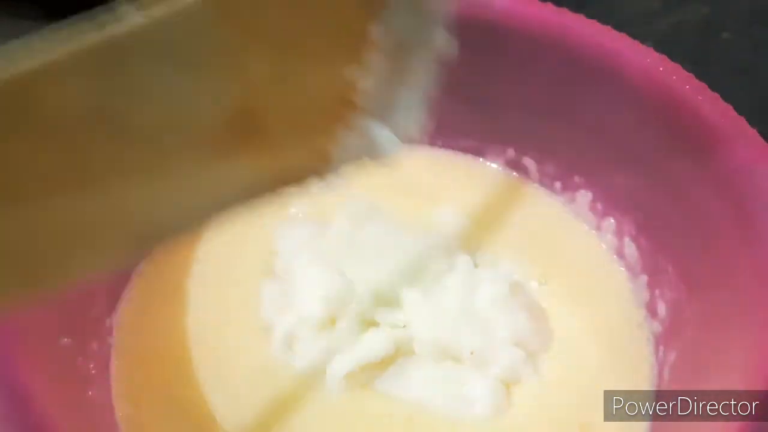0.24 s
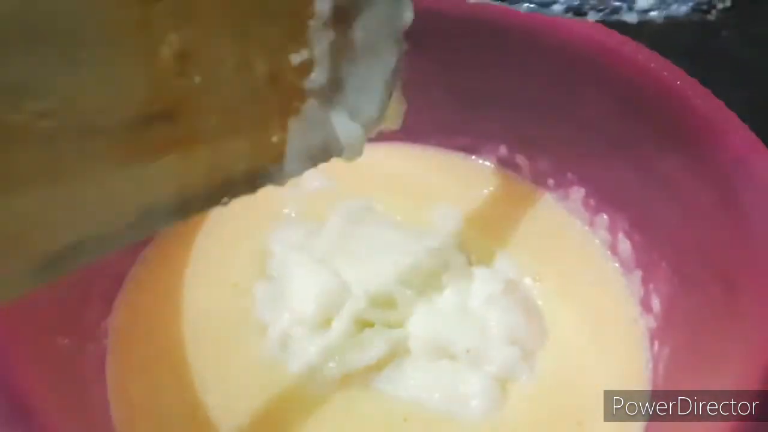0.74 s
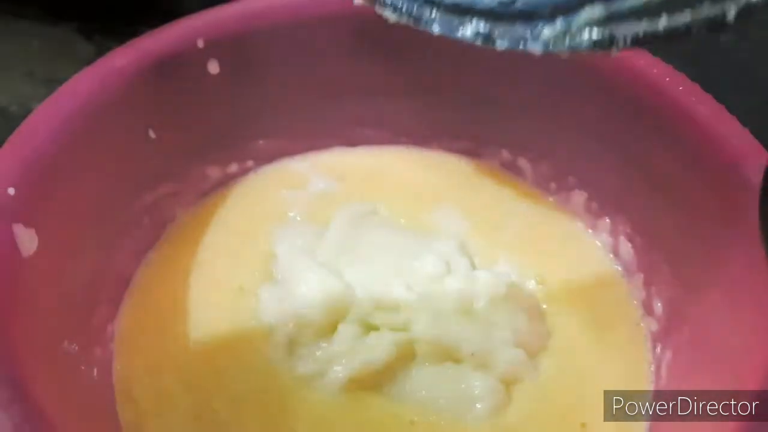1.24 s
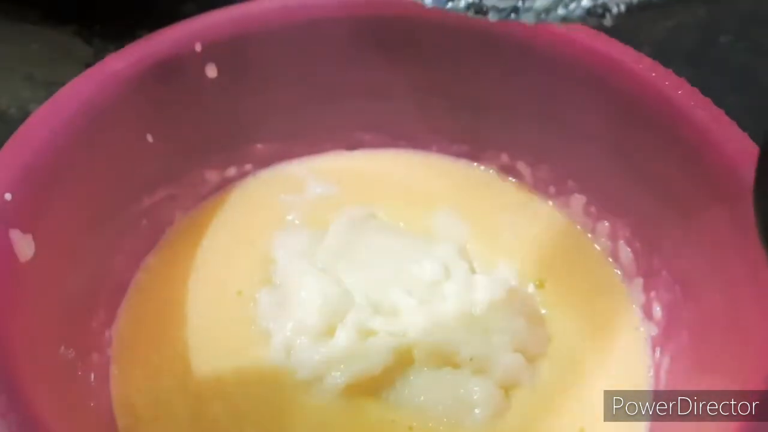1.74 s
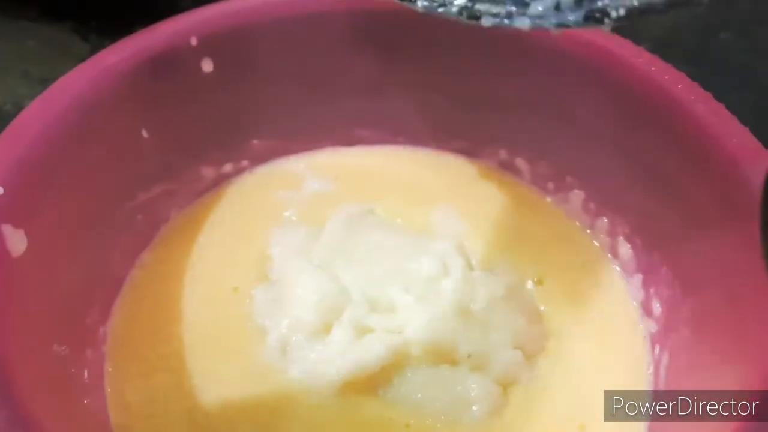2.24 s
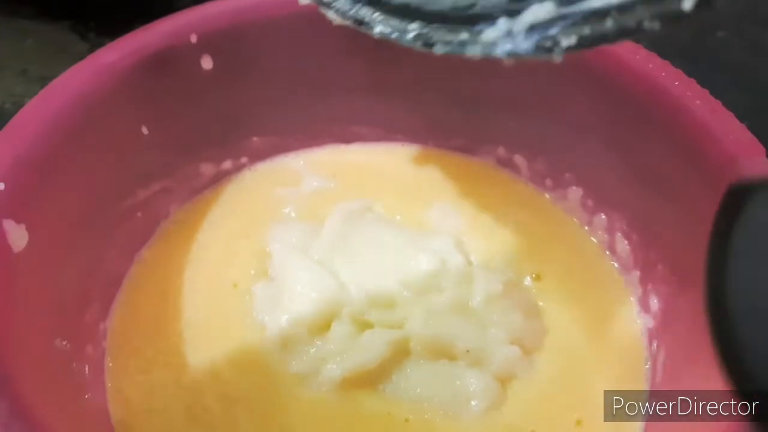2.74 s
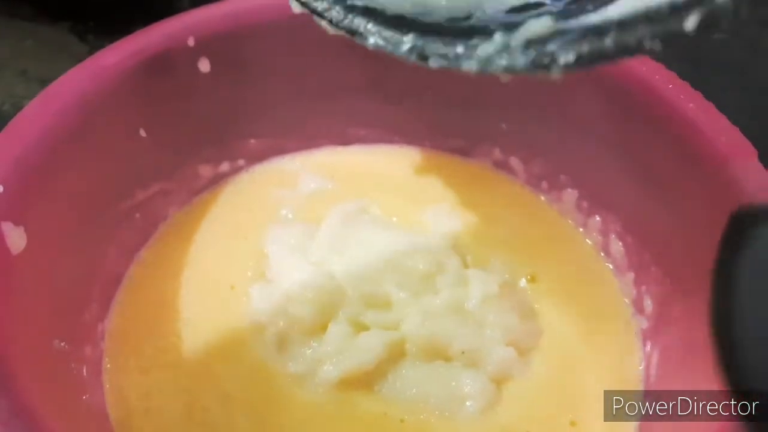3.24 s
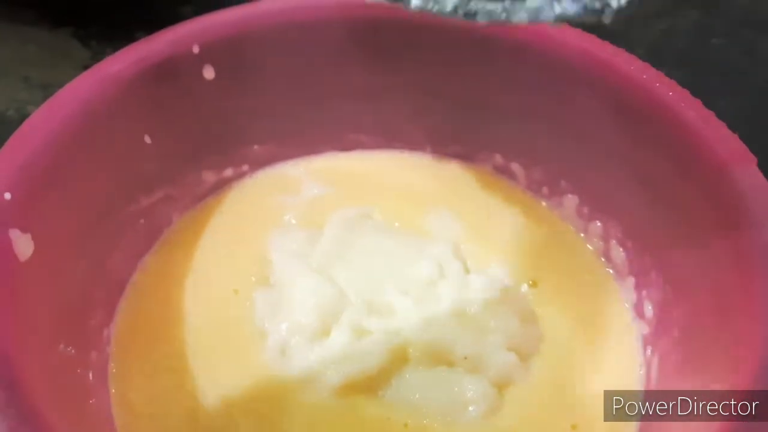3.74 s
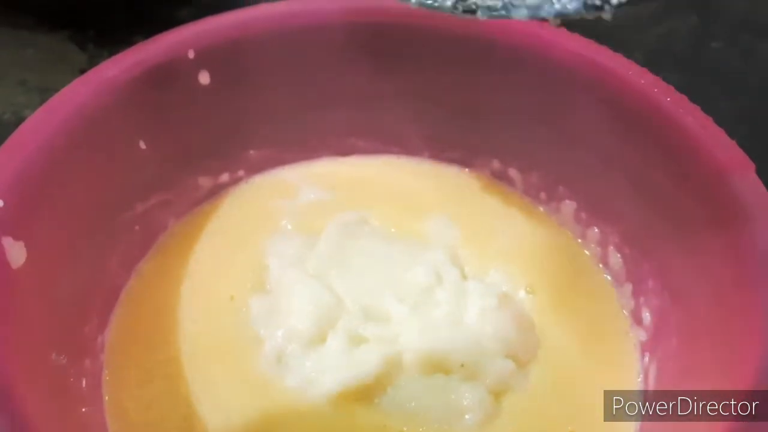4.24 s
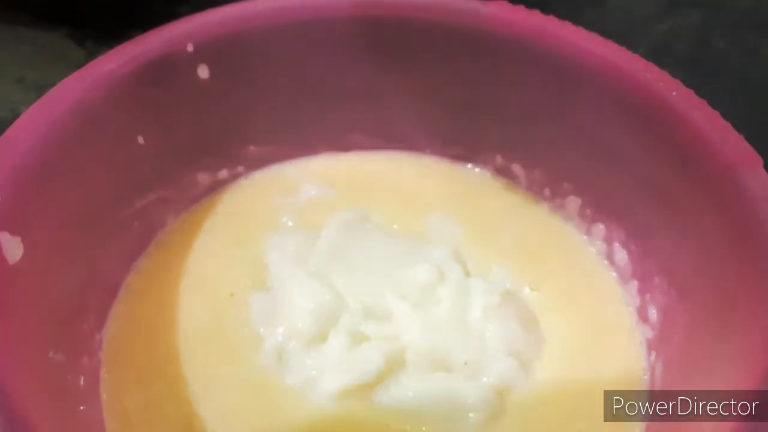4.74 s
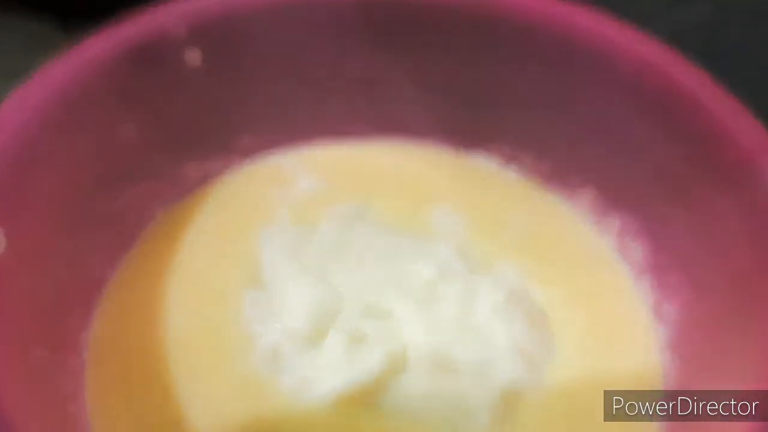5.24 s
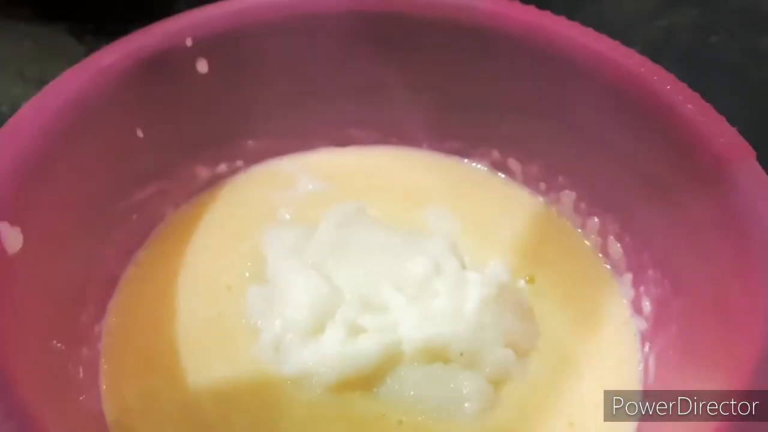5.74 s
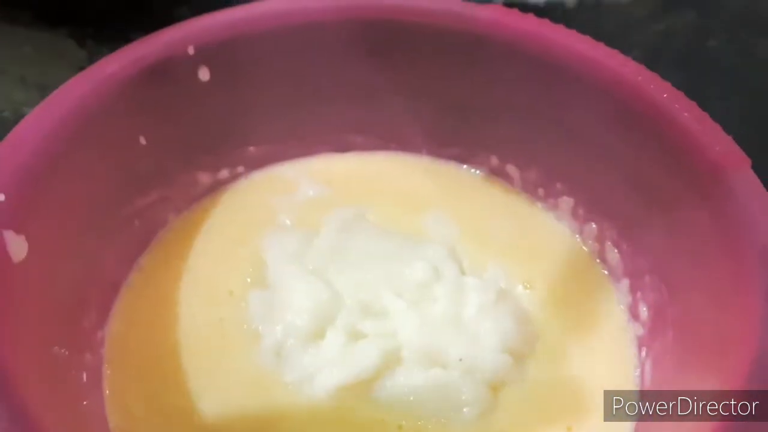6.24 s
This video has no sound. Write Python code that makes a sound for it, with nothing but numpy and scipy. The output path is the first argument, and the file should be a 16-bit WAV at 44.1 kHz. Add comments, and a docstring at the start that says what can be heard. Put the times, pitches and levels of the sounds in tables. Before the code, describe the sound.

One heavy worktop knock, then close, repeated scraping of a wooden spatula clearing wet mixture from a ringing glass bowl.

```python
"""A faint scrape, then one heavy knock on a kitchen worktop. After it a wooden spatula clears the last
of a mixture from a thick glass bowl, close to a stereo pair of microphones. The blade lands with soft
knocks and drags along the wall; both set glass and wood ringing, while the contact rasps and hisses
and the wet film pops. Mains hum and room noise lie underneath, a faint high rustle comes at either
end, and the kitchen adds a short tail."""
import sys
import numpy as np
from scipy import signal
from scipy.fft import rfft, irfft
from scipy.io import wavfile

SR = 44100
rng = np.random.default_rng(int(sys.argv[2]) if len(sys.argv) > 2 else 0)


def store_pcm(level_fs):
    """Save levels as 16-bit WAV."""
    pcm = np.round(np.clip(level_fs, -1, 1) * 32767).astype(np.int16)
    wavfile.write(sys.argv[1], SR, np.atleast_2d(pcm).T)


N = 286209


def from_db(db):
    """Amplitude of a level in dB."""
    return 10 ** (np.asarray(db) / 20)


def unit_rms(x):
    """The signal scaled to an rms of 1."""
    return x / np.sqrt(np.mean(x ** 2) + 1e-20)


def curves(rows):
    """One curve per column, joining rows that begin with a time in seconds."""
    times, *columns = np.transpose(rows)
    return [np.interp(np.arange(N) / SR, times, column) for column in columns]


def sides(pan_db):
    """Gains at the two microphones; pan is always left minus right in dB."""
    return from_db(np.array([pan_db / 2, -pan_db / 2]))


def drift(rate_hz):
    """Random wander with an rms of 1: noise through a double one-pole low-pass."""
    r = np.exp(-2 * np.pi * rate_hz / SR)
    return unit_rms(signal.lfilter([1], [1, -2 * r, r * r], rng.standard_normal(N + SR))[SR:])


def filtered(x, order, hz, kind):
    """The signal through a Butterworth filter."""
    return signal.sosfilt(signal.butter(order, hz, kind, fs=SR, output="sos"), x)


def low_cut(x, hz):
    """Bass roll-off, as from a small body that sends out little below its lowest mode."""
    return filtered(x, 3, hz, "high")


def coloured_noise(spectrum, pan, likeness):
    """Stereo noise with level, pan and left-right likeness set by frequency; its mid has an rms of 1."""
    log_hz = np.log(np.maximum(np.fft.rfftfreq(N, 1 / SR), 1))
    gain_db, pan_db, alike = (np.interp(log_hz, np.log(hz), values)
                              for hz, values in map(np.transpose, (spectrum, pan, likeness)))
    alike = np.clip(alike, 0, 1)
    mid, side = rfft(rng.standard_normal((2, N)))
    pair = np.sqrt(1 + alike) * mid + np.sqrt(1 - alike) * side * [[1], [-1]]
    noise = irfft(pair * from_db(gain_db) * sides(pan_db), N)
    return noise / np.sqrt(np.mean(noise.mean(axis=0) ** 2))


def ring(modes, forces):
    """Each mode rings with its own force and reaches the microphones with its own pan and phase."""
    out = np.zeros((2, N))
    for (hz, level_db, t60, pan_db, offset_ms), force in zip(modes, forces):
        r, w = from_db(-60 / (t60 * SR)), 2 * np.pi * hz / SR
        poles = [1, -2 * r * np.cos(w), r * r]
        for mic, phase in enumerate([0, 2 * np.pi * hz * offset_ms / 1000]):
            mode = signal.lfilter([-np.sin(phase), r * np.sin(w + phase)], poles, force[mic] + 1e-18)
            out[mic] += from_db(level_db) * sides(pan_db)[mic] * mode
    return out


def blows(times, db, pan_db, sharpness_hz):
    """Force of soft contacts: smooth bumps, wider when the contact is softer."""
    out, t = np.zeros((2, N)), np.arange(200) / SR
    bump = np.exp(-.5 * (2 * np.pi * sharpness_hz * (t - .001)) ** 2)
    for start, level_db, side_db in zip(times, db, pan_db):
        at = round(start * SR)
        force = np.outer(sides(side_db), -from_db(level_db) * bump / bump.sum())
        out[:, at:at + len(t)] += force[:, :N - at]
    return out


def bursts(times, db, pan_db, decay_s, above_hz):
    """Bright noise bursts that die fast."""
    out, t = np.zeros((2, N)), np.arange(2000) / SR
    for start, level_db, side_db in zip(times, db, pan_db):
        at = round(start * SR)
        burst = from_db(level_db) * rng.standard_normal((2, len(t))) * np.exp(-t / decay_s)
        out[:, at:at + len(t)] += sides(side_db)[:, None] * burst[:, :N - at]
    return low_cut(out, above_hz)


def room_tone():
    """The kitchen's own noise, mostly bass, its level wandering slightly."""
    # Colour of the room noise. Each row: frequency in Hz, relative density in dB.
    spectrum = [(15, -47.5), (25, -27.5), (110, -3), (221, -9.5), (305, -8), (782, -24), (997, -19.5),
                (1490, -31), (2420, -32), (2850, -59), (3170, -38), (4750, -35.5), (5140, -44.5),
                (6550, -33.5), (15500, -49.5)]
    # Its balance across the pair. Each row: frequency in Hz, pan in dB.
    pan = [(60, -8), (110, 0), (200, 3), (380, 1.5), (700, -0.5), (1290, 1), (2380, 5), (4400, 0),
           (8120, 1), (15000, 12.5)]
    # How alike the microphones hear it. Each row: frequency in Hz, likeness (below 0 counts as 0).
    likeness = [(60, 0.59), (130, 0.88), (290, 0.85), (640, 0.22), (1410, -0.28), (3100, -0.71),
                (6820, -0.62), (15000, -0.37)]
    return from_db(-55.5 + drift(2.1)) * coloured_noise(spectrum, pan, likeness)


def mains_hum(hz=100.7, third_db=-12.5):
    """A wavering mains hum with a weak third harmonic, a little to the right."""
    # Course of the hum. Each row: time in seconds, level in dB.
    levels = [(0.0, -80), (0.12, -57), (0.67, -53), (1.0, -50.5), (1.32, -62.5), (1.5, -51.5),
              (2.46, -49.5), (2.56, -57.5), (2.95, -49), (3.18, -58.5), (3.4, -46.5), (3.54, -60.5),
              (3.72, -46.5), (4.07, -53), (4.26, -47.5), (4.48, -58), (4.6, -47), (4.83, -56), (5.01, -51),
              (6.49, -51.5)]
    phase = 2 * np.pi * hz * np.arange(N) / SR + 0.31 * drift(6.1)
    tone = np.sqrt(2) * (np.sin(phase) + from_db(third_db) * np.sin(3 * phase))
    return from_db(curves(levels)[0]) * tone * sides(-3.5)[:, None]


def rustle(fade_db_per_s=400):
    """Thin, uneven noise at the top of the range, mostly in the left microphone."""
    # Spells of rustling. Each row: start in seconds, end in seconds, level in dB.
    spells = [(0.04, 0.5, -70), (6.276, 6.42, -68)]
    t = np.arange(N) / SR
    noise = low_cut(rng.standard_normal((2, N)), 8500) * sides(13.0)[:, None]
    gain = sum(from_db(db - fade_db_per_s * abs(t - np.clip(t, start, end))) for start, end, db in spells)
    return gain * from_db(1.8 * drift(30)) * noise


def kitchen_reverb(x, t60_s=0.47, wall_cut_hz=9000):
    """Diffuse tail off the walls: alike at both microphones in the bass, dying faster in the treble."""
    t = np.arange(SR) / SR
    white = rng.standard_normal((2, SR))
    low = filtered(white, 1, wall_cut_hz, "low")
    tail = low * from_db(-60 * t / t60_s) + (white - low) * from_db(-60 * t / (.7 * t60_s))
    tail *= np.clip((t - .003) / 0.0027, 0, 1)   # first walls a metre or two away
    tail /= np.sqrt(np.sum(tail ** 2, axis=1, keepdims=True))
    mid = tail.mean(axis=0)
    return signal.fftconvolve(x, mid + low_cut(tail - mid, 340), axes=1)[:, :N]


def worktop_knock(at_s=.717):
    """One blow: the board thuds briefly, its lowest modes hang on and loose things on it rattle."""
    # Worktop modes. Each row: frequency in Hz, gain in dB, seconds to fall 60 dB, pan in dB,
    # time offset at the right microphone in ms.
    modes = [(101, -26, .8, -7.5, 0.02), (126.3, -30, 0.74, -8, 0.02), (372.5, -23.5, 0.32, -7, .02),
             (462, -27.5, 0.17, -15, 0.072), (850, -4.5, 0.019, 2, 0.16), (1188, 5, 0.004, 3, 0.21),
             (1590, -11, 0.022, 7.5, 0.12), (2580, 2.5, 0.0025, -9.5, 0.16)]
    force = blows([at_s], db=[-3.5], pan_db=[0], sharpness_hz=1601)
    thud = ring(modes, [force] * len(modes))
    rattle = bursts([at_s + 0.0023], db=[-21], pan_db=[3.0], decay_s=0.007, above_hz=2200)
    return low_cut(thud, 73.2) + filtered(rattle, 2, 5000, "low")


def film_snaps():
    """Tiny pops as the wet film snaps off the glass."""
    # The pops. Each row: start in seconds, level in dB, pan in dB.
    snaps = [(0.138, -55, -2), (1.2092, -49, 11), (2.5406, -46, 29), (3.1452, -51, 20), (3.1543, -40.5, 20),
             (3.758, -65, 21), (4.688, -30.5, 10.5), (5.459, -54, 16), (5.779, -38, 7)]
    return bursts(*np.transpose(snaps), decay_s=0.00087, above_hz=8000)


def friction_hiss(db, flicker_db=2.5, flicker_hz=14):
    """The wet film tears in small bursts; each band of the hiss flickers on its own."""
    # Colour of the friction. Each row: frequency in Hz, relative density in dB.
    spectrum = [(1500, -20.5), (2400, -1.5), (3500, -2), (5300, -8), (6300, 2), (7500, -8), (9500, -7),
                (10600, -11.5), (12000, -1.5), (14000, -20), (15700, -19)]
    # Its balance across the pair. Each row: frequency in Hz, pan in dB.
    pan = [(60, -21.5), (110, -1.5), (200, 0.5), (380, 13), (700, -43.5), (1290, 6), (2380, 8.5),
           (4400, -11.5), (8120, 13), (15000, 19.5)]
    crackle = from_db(2.2 * drift(570) + 1.6 * drift(50))
    noise = coloured_noise(spectrum, pan, likeness=[(500, 0.74), (3000, 0.16), (15000, .2)])
    edges_hz = np.geomspace(1200, 18000, 7)
    hiss = sum(from_db(flicker_db * drift(flicker_hz)) * filtered(noise, 2, band, "band")
               for band in zip(edges_hz, edges_hz[1:]))
    return from_db(db) * crackle * hiss


def gap_rasp(db, hz, width_hz=306):
    """The air gap between blade and wall resonates; its pitch slides as the blade moves."""
    r = np.exp(-2 * np.pi * width_hz / SR)
    slow = signal.lfilter([1], [1, -2 * r, r * r], rng.standard_normal((2, N)))
    phase = 2 * np.pi * np.cumsum(hz) / SR
    return from_db(db) * unit_rms(slow[0] * np.cos(phase) + slow[1] * np.sin(phase))


def stroke_curves(settle_s=.034, travel_s=0.11, hiss_over_treble_db=5.5):
    """Levels, pitch and pan of the drag; the blade is off the glass between strokes."""
    # Course of the drag, one list a stroke. Each row: time in seconds, then the treble of the
    # friction, the ringing of the bowl and the rasp, all in dB.
    drags = [
        [(0.1, -94, -85, -95), (0.128, -72, -85, -92), (0.14, -72, -62, -74), (0.326, -76, -79, -72),
         (0.388, -74, -84, -92), (0.402, -74.5, -54, -91), (0.428, -69, -48, -92), (0.62, -89, -71, -94)],
        [(1.2, -79, -52.5, -67), (1.224, -68, -45, -69), (1.248, -70.5, -52, -83), (1.296, -54, -45, -45),
         (1.338, -50.5, -29, -38), (1.372, -44, -29.5, -37), (1.456, -63, -40, -68), (1.56, -94, -59, -89)],
        [(1.725, -57.5, -39.5, -58), (1.755, -54.5, -42, -60), (1.765, -54.5, -38, -53),
         (1.781, -52.5, -38, -39.5), (1.817, -54, -34, -37.5), (1.835, -51, -31, -49), (1.889, -62, -38.5, -71),
         (2.0, -82, -56, -68)],
        [(2.137, -54.5, -34, -48), (2.169, -54, -35.5, -52), (2.203, -51.5, -36.5, -34.5),
         (2.243, -53, -34, -40), (2.267, -50, -34.5, -51), (2.301, -62.5, -40.5, -48), (2.375, -73, -56, -68),
         (2.4, -82.5, -56, -67.5)],
        [(2.53, -65, -36, -54), (2.54, -55.5, -34, -55), (2.572, -56.5, -38, -53), (2.614, -50, -28, -34.5),
         (2.672, -50, -27.5, -43), (2.678, -52, -26.5, -55), (2.762, -72, -50, -72), (2.8, -81, -53, -75)],
        [(2.936, -51, -38, -41), (2.98, -45.5, -28, -42), (3.02, -49, -37, -42.5), (3.052, -51.5, -43.5, -52),
         (3.13, -75, -54, -76), (3.154, -66, -63, -77), (3.164, -75, -68, -75), (3.2, -71, -57, -72)],
        [(3.324, -53.5, -41, -47), (3.37, -53.5, -37, -45.5), (3.41, -56, -46.5, -50), (3.444, -73, -64.5, -71),
         (3.492, -70.5, -64, -74), (3.532, -81, -72, -81), (3.544, -69, -68, -87), (3.56, -88, -82, -92)],
        [(3.702, -59, -43, -46), (3.714, -56, -38, -54), (3.764, -49.5, -33.5, -33.5),
         (3.812, -53, -24.5, -37.5), (3.834, -50, -29.5, -43), (3.902, -70.5, -38.5, -63),
         (3.952, -69, -59, -67), (4.0, -75.5, -53, -66)],
        [(4.137, -56, -33, -52), (4.155, -54.5, -38, -51), (4.167, -51.5, -30.5, -37), (4.205, -52, -28, -29.5),
         (4.219, -54.5, -35, -40), (4.237, -60, -33.5, -48), (4.285, -75, -47, -53), (4.38, -73, -60, -72)],
        [(4.521, -69, -52, -65.5), (4.551, -56.5, -41, -57), (4.573, -56, -48.5, -62),
         (4.627, -49.5, -42.5, -49), (4.679, -65, -53.5, -61), (4.693, -57, -50, -59), (4.719, -70, -59, -70),
         (4.8, -73, -74, -75)],
        [(4.922, -69, -53.5, -56), (4.998, -58.5, -42, -57), (5.012, -58.5, -44.5, -65),
         (5.038, -57.5, -43, -51.5), (5.072, -71, -47.5, -73), (5.146, -79, -69, -84), (5.158, -84, -73, -87.5),
         (5.18, -87.5, -67.5, -94)],
        [(5.291, -63.5, -38.5, -54), (5.307, -63, -33.5, -55), (5.329, -59, -42, -65), (5.355, -57, -36.5, -52),
         (5.387, -62, -40.5, -59), (5.447, -73.5, -57, -68), (5.459, -68.5, -59.5, -68), (5.52, -88, -63, -74)],
        [(5.657, -62.5, -37, -41), (5.695, -54, -34.5, -33.5), (5.731, -57.5, -39, -52), (5.739, -52, -34, -47),
         (5.771, -65.5, -43.5, -61), (5.781, -61, -41, -57), (5.793, -68, -44, -60), (5.86, -74, -63, -73)],
        [(5.966, -58.5, -31, -40), (5.98, -66.5, -49, -57), (5.998, -61, -45, -57), (6.014, -69, -48, -55),
         (6.026, -69, -43, -62), (6.058, -78, -59, -68), (6.062, -73.5, -56.5, -66), (6.2, -85, -75, -80)],
    ]
    # Where the blade bears in each stroke. Each row: drive of the low and middle glass modes in dB
    # against the ringing, of the upper modes and the wood in dB against the treble, rasp pitch in Hz,
    # its slide in Hz per second, pan in dB.
    bearings = [(-24, -39, -25, -37, 1300, -900, -3.5), (-24, -21, -2, -29, 1400, -300, -2),
                (-23, -23.5, -9.5, -28.5, 1400, -1500, -2.7), (-28, -24, -10.5, -28, 1300, -2500, -2.5),
                (-27, -24, -7.5, -20, 1500, -900, -2.5), (-41.5, -20.5, -18, -17, 1400, -300, -4.5),
                (-28.5, -25.5, -21, -14, 1350, -1500, -5.5), (-22.5, -23, -13, -24, 1400, -5000, -2),
                (-25.5, -26.5, -14.5, -17, 1250, -900, -3), (-23.5, -24.5, -18, -22.5, 1300, 901, -3.5),
                (-22.5, -36, -24, -19.5, 1200, -300, -5), (-25, -35, -14.5, -12.5, 1220, 303.5, -4),
                (-30.5, -23, -8.5, -23, 1220, -300, -3.5), (-23, -28.5, -12, -11.5, 1400, 298.5, -5)]
    # How those four drives follow ringing or treble. Each row: dB per dB below the stroke's peak,
    # lean along the stroke in dB per second.
    follow = [(1.1, -37.5), (1.83, 33), (1.91, 50.5), (1.59, -130)]
    steepness, lean = np.transpose(follow)
    lift_db = -60 * np.array([0, 1, 1, 1, 1, 1, 0, 1, 0])   # lowers only the level columns
    time_column = np.eye(9)[0]
    rows = []
    for drag, (*drive_db, hz, slide, pan_db) in zip(drags, bearings):
        times, treble, ringing, rasp = np.transpose(drag)
        guide = np.transpose([ringing, ringing, treble, treble])
        peak = guide.max(axis=0)
        along_s = np.clip(times - times[treble.argmax()], -travel_s, travel_s)   # 0 at the fastest moment
        drives = peak + drive_db + steepness * (guide - peak) + np.outer(along_s, lean)
        pitch = hz + slide * along_s
        stroke = np.c_[times, drives, rasp, pitch, treble + hiss_over_treble_db, [pan_db] * len(times)]
        before = stroke[0] - (settle_s + .002) * time_column + lift_db
        landing = stroke[0] - settle_s * time_column + lift_db / 10
        after = stroke[-1] + .02 * time_column + lift_db
        rows += [before, landing, *stroke, after]
    return curves(rows)


def spatula_in_bowl(contact_hz=1325, rasp_to_glass_db=-14):
    """Knocks and the rough drag of the blade drive glass and wood; the contact rasps and hisses."""
    # Landings of the blade. Each row: time in seconds, force in dB, then against that force the drive
    # of the wood, the 1.2 kHz mode and the higher modes in dB, then pan in dB, splash level in dB.
    taps = [(0.4031, -45, -35, -14, -18.5, 0, -62), (1.173, -50.5, -4, -2.5, -26, -1, -61),
            (1.219, -40, -5.5, -12, -17, 1, -55), (1.687, -24, -7.5, -26, -44, 4, -58),
            (2.101, -17.5, -7, -3.5, -2, 6, -47), (2.493, -15, -13, -30, -15, 8, -63),
            (2.8772, -40.5, 0, 14, 4.5, -3, -49), (2.898, -14, -9.5, 2.5, 5.5, 3, -38.5),
            (3.261, -29.5, -7.5, 7, 2, 0, -51), (3.286, -25, -3, -19, 13, 3.5, -44.5),
            (3.667, -24.5, -4.5, -1, 1.4, 7, -64.5), (4.101, -24, -4, -13, 8.5, 5.5, -49),
            (4.1996, -22.5, -18, 9, -28, -10, -52), (4.484, -45.5, -10.5, 1.5, -14, 7, -63),
            (4.544, -33.5, -25, -10, -2, 11, -58), (4.886, -38, -9.5, 4.5, 2, 1, -62),
            (5.254, -14, -16.5, -9.5, -11.5, 3, -59), (5.3504, -26.5, -10, -9.5, -24.5, -2, -52.5),
            (5.616, -15, -14.5, 17, -5.5, -2, -71), (5.93, -26, -16, 18, -17, 2.1, -57),
            (5.993, -35.5, -4, -8, 0, 1.5, -54), (6.463, -10, -17.5, -3.5, -6.5, 4.5, -49)]
    # Modes of the glass bowl. Each row: frequency in Hz, gain in dB, seconds to fall 60 dB, pan in dB,
    # time offset at the right microphone in ms.
    glass_modes = [(1039, -4, 0.087, -2, 0.081), (1083, -2, 0.11, 9.5, 0.31), (1198, -5, 0.025, 10.5, 0.24),
                   (1815, -8, 0.04, 3, 0.13), (1892, -6.5, 0.1, -5, 0.15), (1959, 1.5, 0.079, 10, 0.12),
                   (2152, -16, 0.11, -4, 0.033), (3097, 0, 0.059, 4, 0.081),
                   (3510, -0.5, 0.011, 10.5, 0.066), (4630, -11, 0.03, 4, 0.023),
                   (4616, 0, 0.025, 8.5, 0.068), (4820, -15.5, 0.073, -2.5, 0.017),
                   (6430, -11, 0.033, -5.5, 0.049), (8230, -17, 0.03, -5, 0.021)]
    # Modes of the wooden blade and the air in the bowl, with the same columns.
    wood_modes = [(177, -12, 0.029, -4.5, .02), (309, -9, 0.15, -2.5, .02), (376.3, -2, 0.073, -2.5, .02),
                  (673.4, 6.5, 0.045, 8, 0.052), (785, 6, 0.03, 8, 0.059), (909.3, 4.5, 0.081, -2.5, 0.21),
                  (1545, 5, 0.0045, 16, 0.09)]
    times, force_db, wood_db, side_mode_db, higher_db, pan_db, splash_db = np.transpose(taps)
    times = times + 0.0004   # each landing sounds 0.4 ms after its listed time
    low_db, middle_db, upper_db, rumble_db, rasp_db, rasp_hz, hiss_db, drag_pan_db = stroke_curves()
    grip = from_db(2.2 * drift(80))   # the blade grips unevenly
    rough = rng.standard_normal((len(glass_modes) + len(wood_modes), N)) * grip

    # The spot struck decides how each group of glass modes answers.
    low_tap = blows(times, force_db, pan_db, contact_hz)
    side_tap = blows(times, force_db + side_mode_db, pan_db, contact_hz)
    high_tap = blows(times, force_db + higher_db, pan_db - 4.5, contact_hz)
    knocks = [low_tap, side_tap, high_tap, high_tap]
    drags = [from_db(db) * sides(drag_pan_db)
             for db in (low_db, rasp_db + rasp_to_glass_db, middle_db, upper_db)]
    groups = np.searchsorted([1150, 1600, 2600], np.array(glass_modes)[:, 0])   # edges in Hz
    glass = ring(glass_modes, [knocks[g] + drags[g] * noise for g, noise in zip(groups, rough)])

    wood_tap = blows(times, force_db + wood_db, pan_db, contact_hz)
    wood = ring(wood_modes, [wood_tap + from_db(rumble_db) * noise for noise in rough[len(glass_modes):]])
    hiss = friction_hiss(hiss_db)
    splash = bursts(times, splash_db, pan_db + 6, decay_s=0.019, above_hz=4000)   # mixture squeezed out
    rasp = grip * gap_rasp(rasp_db, rasp_hz) * sides(drag_pan_db + 7.5)
    return low_cut(glass, 436) + low_cut(wood, 160) + rasp + hiss + splash


def close_pair(x, alike_below_hz=200):
    """Bass from a near source reaches both microphones alike."""
    side = filtered((x[0] - x[1]) / 2, 1, alike_below_hz, "high")
    return x.mean(axis=0) + side * [[1], [-1]]


def scene():
    """The bowl close and fairly dry, the worktop knock with more room, the background beneath."""
    bowl = spatula_in_bowl() + film_snaps()
    knock = worktop_knock()
    room = kitchen_reverb(from_db(-12.5) * bowl + from_db(-3) * knock)
    return close_pair(bowl + knock + room) + mains_hum() + room_tone() + rustle()


def record(dry):
    """The loudest peaks are rounded softly, and the recorder cuts the top of the treble."""
    knee, headroom, cutoff_hz = .6, .33, 15800
    squeezed = np.sign(dry) * (knee + headroom * np.tanh((abs(dry) - knee) / headroom))
    rounded = np.where(abs(dry) < knee, dry, squeezed)
    return signal.sosfilt(signal.cheby2(20, 60, cutoff_hz, fs=SR, output="sos"), rounded)


dry = scene()
out = record(dry)
store_pcm(out)
```